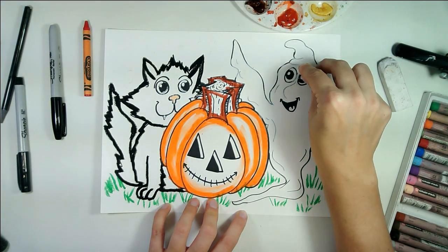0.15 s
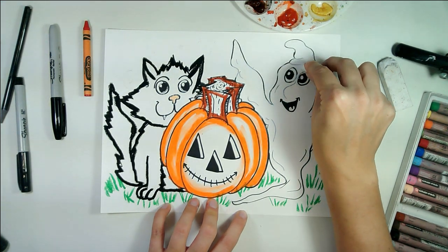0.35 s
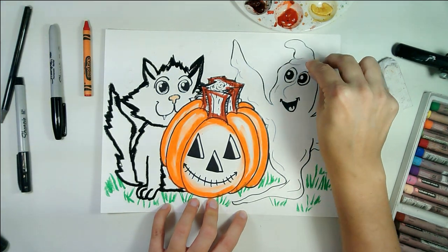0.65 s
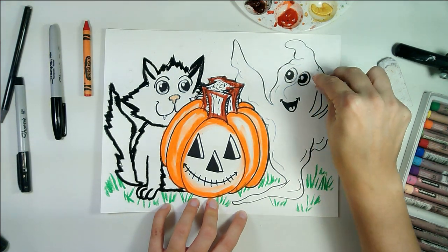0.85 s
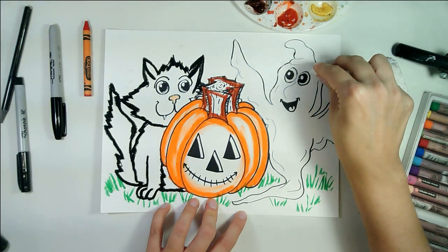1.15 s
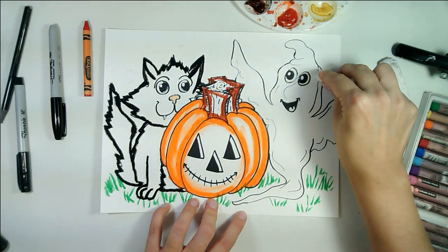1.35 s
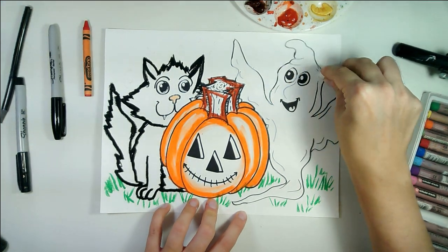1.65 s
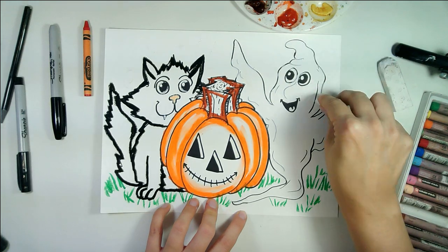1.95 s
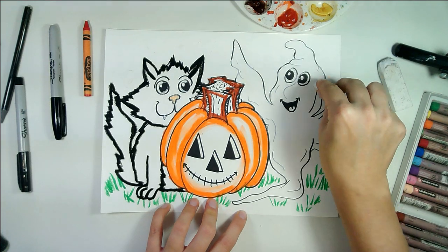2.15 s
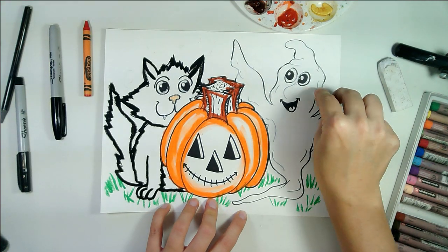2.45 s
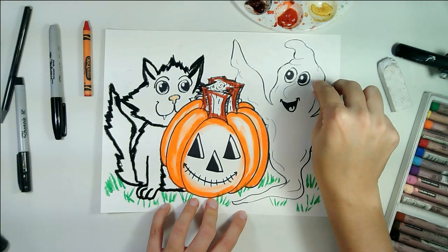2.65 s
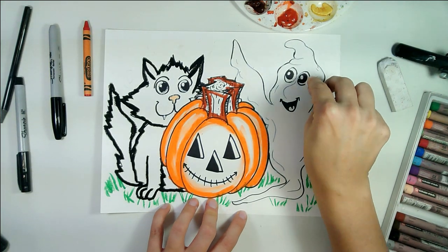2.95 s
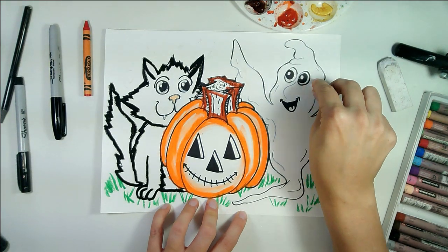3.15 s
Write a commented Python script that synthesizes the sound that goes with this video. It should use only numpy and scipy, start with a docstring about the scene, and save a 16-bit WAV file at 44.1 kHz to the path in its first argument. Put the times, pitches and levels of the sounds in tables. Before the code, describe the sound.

An oil pastel rubs paper continuously, about eight short strokes a second, each swelling and dipping. Raspy, uneven strokes run from 0 to 1.2 s, with soft low desk knocks around 0.7-1.0 s and faint finger scuffs. Strokes become very light around 1.4-2.1 s, then press again from 2.5 s, hissier and smoother, with dull bumps near 2.7 and 3.05 s. Deep sway and faint room air lie beneath; close, small dry room.

```python
"""An oil pastel is scribbled back and forth on paper lying on a desk, about eight strokes a second.
Random wax slips, shaped by stroke speed, give hiss, fizz, rasp and sheet tone; desk rumble is shaped noise.
Decaying sines knock the desk; noise bursts and a dull drag are the hand. Strokes lighten, then press again.
Behind: a stand's low sway and steady room air, both filtered noise; a short tail of the room."""
import sys
import numpy as np
from scipy import signal
from scipy.fft import rfft, irfft
from scipy.io import wavfile
from scipy.ndimage import uniform_filter1d

SR = 44100
rng = np.random.default_rng(int(sys.argv[2]) if len(sys.argv) > 2 else 0)


def wav_record(signal):
    """Record a signal, one row per channel, as 16-bit PCM in the file named by sys.argv[1]."""
    frames = np.transpose(np.atleast_2d(signal))
    bounded = np.clip(frames, -1, 1)
    # unit amplitude maps onto the largest positive 16-bit level
    quanta = np.round(bounded * 32767).astype(np.int16)
    wavfile.write(sys.argv[1], SR, quanta)


N = 145530
TIME_S = np.arange(N) / SR

# All spectra are relative: the filtered sound is scaled to rms 1.
# Strokes, each lasting until the next; levels before the trims below:
# [start t/s, fastest point/share of stroke, hiss level/dB, rasp over hiss/dB, desk level/dB]
STROKES = [(-.06, 0.27, -65.5, 5.5, -47), (0.067, 0.48, -76.3, 2.5, -54.5), (0.214, 0.6, -69, 3.5, -60),
           (0.38, 0.47, -76.5, -0.5, -57.5), (0.512, 0.52, -69.5, 4, -58.5),
           (0.661, 0.54, -71.5, -3.5, -51.5), (.8, 0.53, -68, 2.5, -60), (0.926, 0.47, -69, -3, -52),
           (1.058, 0.49, -69, 0, -58), (1.18, 0.45, -74.5, -0.5, -59), (1.29, 0.48, -77.5, -2.5, -66.5),
           (1.396, 0.35, -84.5, -2, -72), (1.496, 0.53, -77, -3.5, -60.5), (1.611, 0.67, -92.5, -7, -91),
           (1.706, .43, -85, -1, -72), (1.842, 0.4, -78.5, -2, -65.5), (1.97, 0.41, -84, -4, -63),
           (2.085, 0.48, -76.5, -2, -59.5), (2.2, 0.51, -80, -2.5, -56), (2.317, 0.51, -77, -1, -59),
           (2.426, 0.4, -79.5, -1.5, -60), (2.568, 0.58, -68, -5.5, -53.5), (2.723, 0.53, -71, -4.5, -51.5),
           (2.859, 0.52, -70.5, -4, -57), (3.005, 0.44, -71, -4, -49), (3.148, 0.42, -73.5, -4, -57)]
# Hiss of the paper's tooth: [f/Hz, level/dB]
HISS_SPECTRUM = [(600, -17), (2000, -0.5), (2700, -4.5), (3300, -2.5), (3700, -10.5), (4300, -2.5),
                 (5700, -3), (6350, -0.5), (6900, -7.5), (7900, 2), (8700, 3), (9650, -7), (10500, -5),
                 (11500, -2.5), (12700, -2.5), (14200, -1), (15700, -4), (16400, -2)]
# Fine fizz of smooth strokes: [f/Hz, level/dB]
FIZZ_SPECTRUM = [(8500, -51), (9900, -15.5), (10800, 0.5), (12800, -1), (14200, 4), (16400, -8)]
# Stick's colour on the rasp: [f/Hz, level/dB]
STICK_SPECTRUM = [(2500, -1), (3200, 2), (3700, -8.5), (4050, 1), (5400, 1), (6100, -1.5)]
# Sheet under the stick: [f/Hz, level/dB]
SHEET_SPECTRUM = [(100, -13), (330, -8.5), (560, -3), (800, -1.5), (1000, -5.5), (1350, 4), (1650, -5),
                  (2050, -7.5), (2600, -15.5), (5000, -34.5)]
# Desk top: [f/Hz, level/dB]
DESK_SPECTRUM = [(25, -5.5), (60, -8), (82, 6), (100, 1.5), (118, 2.5), (145, -2.5), (185, 0.5),
                 (230, -14.5), (320, -17), (500, -28), (1200, -53)]
# Bumps of the stick on the desk: [start t/s, pitch f/Hz, envelope peak level/dB]
KNOCKS = [(.694, 90, -50), (0.735, 167, -51), (.750, 130, -55), (.837, 84, -46.5), (.983, 105, -43),
          (2.662, 134, -52), (3.045, 90, -39), (3.075, 136, -39)]
# Fingers shifting on the paper: [start t/s, rise t/s, decay t/s, peak level/dB]
SCUFFS = [(.182, 0.026, 0.017, -62), (.473, 0.016, 0.035, -65.5), (.773, 0.021, 0.032, -65),
          (2.116, 0.0046, 0.012, -61.5), (2.13, 0.013, 0.038, -62.5)]
# Scuffs: [f/Hz, level/dB]
SCUFF_SPECTRUM = [(200, -8), (550, -1.5), (760, 0), (930, 0.5), (1200, 5), (1400, -1.5), (1560, 2.5),
                  (1690, -1), (1850, 2), (2150, -11.5), (3200, -18.5), (5200, -21), (9000, -34)]
# Drag of the side of the hand: [t/s, level/dB]
DRAG_LEVEL = [(0, -70), (.5, -70), (1.05, -73), (1.5, -84), (1.9, -82.5), (2.3, -74), (3.3, -75.5)]
# Drag: [f/Hz, level/dB]
DRAG_SPECTRUM = [(60, -19.5), (190, -4.5), (235, -0.5), (295, 4), (420, -1), (560, -14), (2000, -16.5),
                 (3500, -33.5)]
# Sway of the stand: [t/s, level/dB]
SWAY_LEVEL = [(0, -37), (.6, -33.5), (1.15, -34), (1.7, -41), (2.3, -38), (2.6, -33), (3.3, -35)]
# Sway: [f/Hz, level/dB]
SWAY_SPECTRUM = [(5, -23.5), (11, -5), (22, -3), (26, -4), (32, -19), (48, -26), (60, -35.5), (100, -66),
                 (300, -110)]
# Room air: [f/Hz, level/dB]
AIR_SPECTRUM = [(30, 8), (70, 10.5), (125, 9.5), (168, 10), (205, -1.5), (330, -1), (520, -2), (900, -0.5),
                (1300, 1.5), (1600, -1.5), (2000, -10), (2700, -15.5), (3300, -13.5), (3800, -18.5),
                (4600, -15), (6500, -24), (16000, -30.5)]

LAST_END_S = 3.29
TURN_SPEED = .1  # share of top speed left at a turn
HISS_SHAPE, RASP_SHAPE, SHEET_SHAPE, DESK_SHAPE = 1.25, 1.4, 0.44, 2.05  # exponents on speed
GRAINS_PER_S = 9000  # at top speed
GRAIN_SPREAD_DB = 1.5  # per unit of an exponential draw
PATCH_DB = 2  # rms
GRIP_HZ, GRIP_DB = 66, 1.08  # uneven grip of the wax: drift rate, rms
HISS_TRIM_DB, RASP_TRIM_DB, DESK_TRIM_DB = 0.5, -3.5, -1.5
FIZZ_TRIM_DB, FIZZ_PER_RASP_DB = -11.5, -1.54
RASP_HZ, RASP_WIDTH_HZ = 4530, 2060  # centre before shifts; width of each resonance
RASP_SAG_HZ_PER_DB = 97  # harder rasp rings lower
RASP_SLOW_RISE_HZ = 590  # rings higher as the stick slows
CATCH_HZ, CATCH_DB, CATCH_DROP_HZ = 30.2, 0.66, 128  # drift rate; rms louder and lower
SHEET_DB, SHEET_FOLLOW = -74, 0.33  # level at mean hiss; dB per dB of hiss
KNOCK_RISE_S = 0.0047
AIR_DB = -69
ROOM_T60_S, ROOM_DB = 0.13, -13
EDGE_HZ = 16450


def amp(db):
    """Decibels to gain."""
    return 10 ** (np.asarray(db) / 20)


def unit(x):
    """Scales to rms 1."""
    return x / np.sqrt(np.mean(x ** 2) + 1e-20)


def level(points):
    """Gain over time, interpolated in dB."""
    return amp(np.interp(TIME_S, *np.transpose(points)))


def colour(x, points):
    """Filters by a spectrum, dB linear over log frequency, to rms 1."""
    hz, db = np.transpose(points)
    f = np.fft.rfftfreq(N, 1 / SR)
    gain_db = np.interp(np.log(f + 1), np.log(hz), db)
    return unit(irfft(rfft(x) * amp(gain_db), N))


def noise(points):
    """Gaussian noise of a given spectrum, rms 1."""
    return colour(rng.standard_normal(N), points)


def wander(hz):
    """Random drift, rms 1, with a Gaussian roll-off in frequency."""
    f = np.fft.rfftfreq(N, 1 / SR)
    return unit(irfft(rfft(rng.standard_normal(N)) * np.exp(-(f / hz) ** 2), N))


def resonate(x, hz, width_hz):
    """One-pole resonance at a moving pitch: shift down, low-pass, shift back."""
    turn = np.exp(2j * np.pi * np.cumsum(hz) / SR)
    r = np.exp(-np.pi * width_hz / SR)
    return 2 * (turn * signal.lfilter([1 - r], [1, -r], x / turn)).real


def motion():
    """Relative stick speed, arched over each stroke, and the smoothed hiss, rasp and desk levels in dB."""
    start, fastest, *levels = np.transpose(STROKES)
    k = np.maximum(np.searchsorted(start, TIME_S, "right") - 1, 0)
    duration = np.diff(np.append(start, LAST_END_S))
    along = np.clip((TIME_S - start[k]) / duration[k], 0, 1)
    # Warp so that the arch peaks at the fastest point
    warp = np.log(.5) / np.log(np.clip(fastest[k], .1, .9))
    arch = abs(np.sin(np.pi * along ** warp))
    speed = TURN_SPEED + (1 - TURN_SPEED) * arch
    return [speed] + [uniform_filter1d(db[k], size=600) for db in levels]


def tooth(speed):
    """Tiny slips of wax over paper fibres: random impulses, more of them at speed."""
    share = np.clip(GRAINS_PER_S * speed / SR, 1e-3, 1)
    size = amp(GRAIN_SPREAD_DB * np.minimum(rng.exponential(1, N), 4))
    sign = rng.choice([-1, 1], N)
    slips = size * sign * (rng.random(N) < share)
    return unit(slips / np.sqrt(share))  # power independent of density


def patchy(x, db):
    """Wax and paper vary from spot to spot: random brief lifts and dips across time and frequency."""
    z = signal.stft(x, nperseg=512)[2]
    field = rng.standard_normal(z.shape)
    for _ in range(2):
        field = uniform_filter1d(field, size=5, axis=0)
        field = uniform_filter1d(field, size=5, axis=1)
    return unit(signal.istft(z * amp(db * unit(field)), nperseg=512)[1][:N])


def patchy_tooth(speed):
    """Wax slips over uneven paper."""
    return patchy(tooth(speed), PATCH_DB)


def hiss(speed, hiss_db, grip_db):
    """Broad hiss of the slips, louder with speed."""
    gain = amp(HISS_TRIM_DB + hiss_db + grip_db)
    return colour(patchy_tooth(speed), HISS_SPECTRUM) * gain * speed ** HISS_SHAPE


def fizz(speed, hiss_db, rasp_db, grip_db):
    """High fizz of the slips, stronger where the stroke rasps little."""
    gain = amp(FIZZ_TRIM_DB + hiss_db + FIZZ_PER_RASP_DB * rasp_db + grip_db)
    return colour(patchy_tooth(speed), FIZZ_SPECTRUM) * gain * speed ** HISS_SHAPE


def rasp(speed, hiss_db, rasp_db, grip_db):
    """Slips ring the stick through three resonances; catches make it louder and lower."""
    catch = wander(CATCH_HZ)
    ring_hz = RASP_HZ - RASP_SAG_HZ_PER_DB * rasp_db - CATCH_DROP_HZ * catch
    ring_hz = ring_hz + RASP_SLOW_RISE_HZ * (1 - speed)
    ring = patchy_tooth(speed)
    for _ in range(3):
        ring = resonate(ring, ring_hz, RASP_WIDTH_HZ)
    gain = amp(RASP_TRIM_DB + hiss_db + rasp_db + grip_db + CATCH_DB * catch)
    return colour(ring, STICK_SPECTRUM) * gain * speed ** RASP_SHAPE


def sheet(speed, hiss_db, grip_db):
    """Slips sound the sheet, whose level follows the hiss only in part."""
    gain = amp(SHEET_DB + SHEET_FOLLOW * (hiss_db - hiss_db.mean()) + grip_db)
    return colour(tooth(speed), SHEET_SPECTRUM) * gain * speed ** SHEET_SHAPE


def desk(speed, desk_db):
    """Desk rumble: low noise swelling steeply with speed."""
    return noise(DESK_SPECTRUM) * amp(DESK_TRIM_DB + desk_db) * speed ** DESK_SHAPE


def pastel():
    """Hiss, fizz, rasp, sheet and desk driven by one stroke motion; grip is common to the first four."""
    speed, hiss_db, rasp_db, desk_db = motion()
    grip_db = GRIP_DB * wander(GRIP_HZ)
    out = hiss(speed, hiss_db, grip_db) + fizz(speed, hiss_db, rasp_db, grip_db)
    out += rasp(speed, hiss_db, rasp_db, grip_db)
    return out + sheet(speed, hiss_db, grip_db) + desk(speed, desk_db)


def knocks():
    """Each bump pushes the desk top down; it swings briefly as a damped sine."""
    out = np.zeros(N)
    for start_s, hz, db in KNOCKS:
        t = np.maximum(TIME_S - start_s, 0)
        swing = t / KNOCK_RISE_S * np.exp(1 - t / KNOCK_RISE_S)
        out -= amp(db) * swing ** 2 * np.sin(2 * np.pi * hz * t)
    return out


def scuffs():
    """Fingers shift on the paper: noise bursts with linear rise and exponential decay."""
    swell = np.zeros(N)
    for start_s, rise_s, decay_s, db in SCUFFS:
        t = TIME_S - start_s
        rise = np.clip(t / rise_s, 0, 1)
        decay = np.exp(-np.maximum(t - rise_s, 0) / decay_s)
        swell += amp(db) * rise * decay
    return colour(patchy(rng.standard_normal(N), PATCH_DB), SCUFF_SPECTRUM) * swell


def drag():
    """The side of the hand drags dully over the paper: noise of slowly varying level."""
    return noise(DRAG_SPECTRUM) * level(DRAG_LEVEL)


def stand():
    """The stand sways: low noise with its own swells flattened, eased at both ends."""
    sway = noise(SWAY_SPECTRUM)
    power = abs(signal.hilbert(sway)) ** 2
    power = uniform_filter1d(uniform_filter1d(power, size=6000), size=4000)
    to_end_s = np.minimum(TIME_S, TIME_S[::-1])
    ease = .12 + .88 * np.sin(np.pi / 2 * np.minimum(to_end_s / .05, 1)) ** 2
    return sway / np.sqrt(power / 2) * level(SWAY_LEVEL) * ease


def air():
    """Room air: steady noise."""
    return amp(AIR_DB) * noise(AIR_SPECTRUM)


def room(x):
    """Tail from the nearby walls: exponentially decaying noise after a 4 ms gap."""
    t = TIME_S[:SR // 2]
    tail = rng.standard_normal(len(t)) * amp(-60 * t / ROOM_T60_S) * (t > .004)
    return amp(ROOM_DB) * signal.fftconvolve(x, tail / np.linalg.norm(tail))[:N]


def scene():
    """Pastel, knocks and hand with their room tail, over sway and air; one channel."""
    drawing = pastel() + knocks() + scuffs() + drag()
    return (drawing + room(drawing) + stand() + air())[None]


def record(dry):
    """Band limit: linear-phase low-pass."""
    taps = signal.firwin(511, EDGE_HZ, window=("kaiser", 9), fs=SR)
    return signal.oaconvolve(dry, taps[None], "same")


dry = scene()
out = record(dry)
wav_record(out)
```